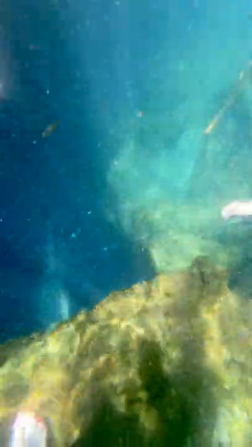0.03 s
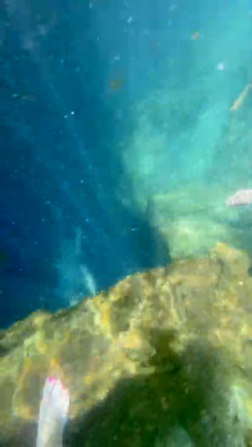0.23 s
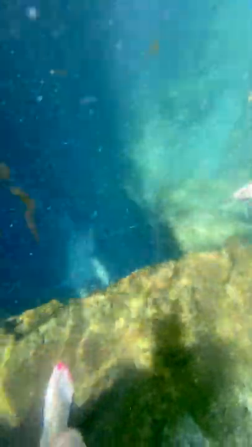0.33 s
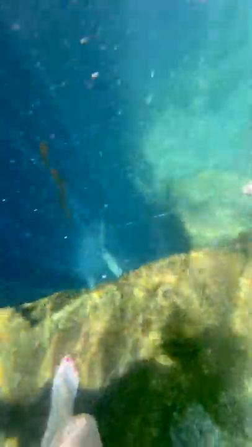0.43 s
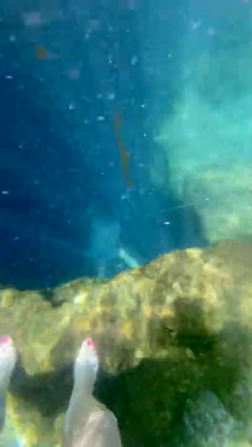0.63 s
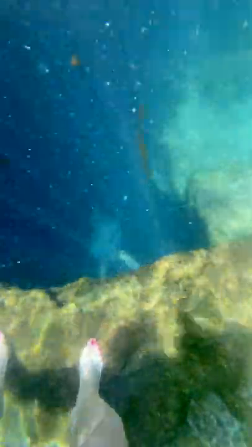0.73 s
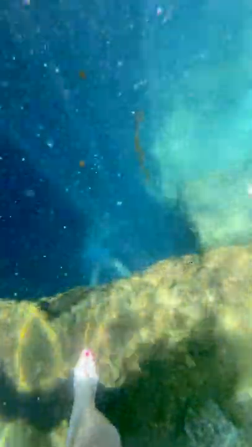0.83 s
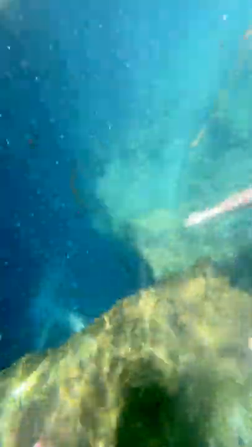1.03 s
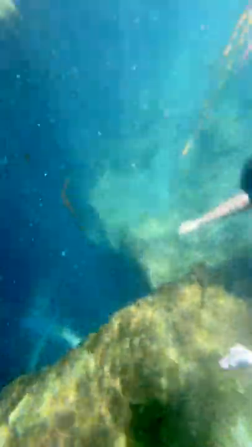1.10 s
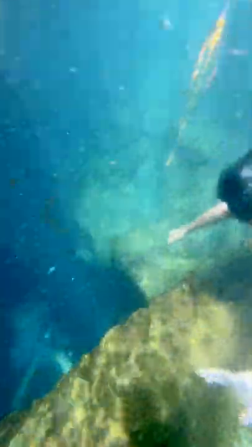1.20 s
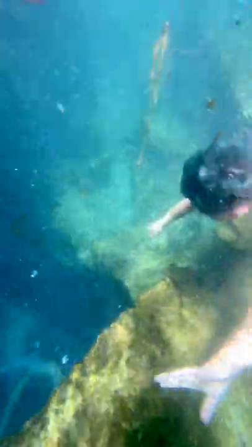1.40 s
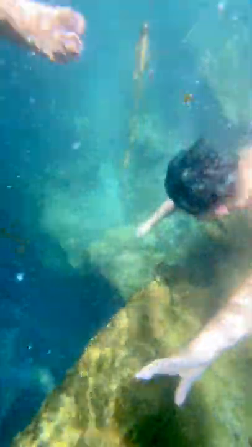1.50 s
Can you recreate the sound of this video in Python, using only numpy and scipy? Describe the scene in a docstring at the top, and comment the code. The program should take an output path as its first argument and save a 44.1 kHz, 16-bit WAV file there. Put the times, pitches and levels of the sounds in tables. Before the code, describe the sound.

Underwater in a pool, bubbles gurgle and gulp close to the microphone, loudest early on, with little blips mostly to the left. The bubbling eases over a soft rumble before water swishes past and knocks dully on the housing.

```python
"""Underwater in a spring pool.

Water moves round a submerged camera, heard at its two ports. Bubbles ring as damped oscillators, the
smaller the higher: clouds of them gurgle, fizz and crackle, single ones blip mostly on the left, and
air pockets gulp near 370 Hz. Eddies rumble and thump on the housing, tiny clicks tick on it, and
turbulence swishes past, mainly late on. Everything is muffled, with almost no treble."""
import sys
import numpy as np
from scipy import signal
from scipy.fft import rfft, irfft, next_fast_len
from scipy.io import wavfile
from scipy.ndimage import uniform_filter1d

SR = 44100
rng = np.random.default_rng(int(sys.argv[2]) if len(sys.argv) > 2 else 0)


def dump_mix(stems):
    """Bounce the given channels to the path in sys.argv[1] as a 16-bit WAV at rate SR."""
    frames = np.atleast_2d(stems).T  # one column per channel
    limited = np.clip(frames, -1, 1)  # hard clip at full scale
    pcm = np.round(limited * 32767).astype(np.int16)
    wavfile.write(sys.argv[1], SR, pcm)


N = 68355
TIME = np.arange(N) / SR


def undb(db):
    """Amplitude ratio of a level in decibels."""
    return 10 ** (np.asarray(db) / 20)


def unit(x):
    """Normalisation to an rms of 1."""
    return x / np.sqrt(np.mean(x ** 2))


def envelope(rows):
    """Gain over time, by interpolation between (time [s], level [dB]) points."""
    return undb(np.interp(TIME, *np.array(rows).T))


def pan(db):
    """Amplitude panning: two gains that put the left channel db above the right."""
    return undb(np.array([[db], [-db]]) / 2)


def colour(x, points):
    """Minimum-phase filtering through (frequency [Hz], gain [dB]) points."""
    hz, db = np.array(points).T
    size = 2 * next_fast_len(N)
    bin_hz = np.maximum(np.arange(size // 2 + 1) * SR / size, 1)
    gain = undb(np.interp(np.log(bin_hz), np.log(hz), db))
    cepstrum = irfft(np.log(gain))
    cepstrum[1:size // 2] *= 2  # folding the cepstrum makes the filter causal
    cepstrum[size // 2 + 1:] = 0
    return irfft(rfft(x, size) * np.exp(rfft(cepstrum)))[:N]


def drift(per_s):
    """Smooth random modulation of rms 1, with per_s new values a second."""
    hold = max(int(SR / per_s), 2)
    steps = np.repeat(rng.standard_normal(N // hold + 1), hold)
    return unit(uniform_filter1d(steps, hold)[:N])


def decay(start, t60):
    """Exponential decay: silence until start, then a fall of 60 dB every t60 seconds."""
    return (TIME > start) * np.exp(-np.log(1000) * np.abs(TIME - start) / t60)


def ring(start, hz, rise, t60):
    """A damped oscillator that swells, then decays; its phase is the integral of its frequency."""
    age = np.maximum(TIME - start, 0)
    cycles = np.cumsum(hz * np.diff(age, prepend=0))
    swell = np.sin(np.pi / 2 * np.minimum(age / rise, 1)) ** 2
    damping = np.exp(-np.log(1000) * np.maximum(age - rise, 0) / t60)
    return swell * damping * np.sin(2 * np.pi * cycles)


def cloud(spectrum, low_hz, high_hz, cycles, spread_db, count):
    """Superposition of random damped bubbles, evenly strewn in time, filtered and set to rms 1."""
    out = np.zeros(2 * N)
    for slot, (when, pitch, strength, polarity) in enumerate(rng.random((count, 4))):
        hz = low_hz * (high_hz / low_hz) ** pitch
        life = np.linspace(0, 1, int(np.clip(cycles * SR / hz, 8, N)))
        phase = 2 * np.pi * cycles * life * (1 + 0.044 * life)  # each pitch rises a little
        bubble = np.exp(-np.log(1000) * life) * np.sin(phase)
        gain = hz * np.sign(polarity - .5) * undb(spread_db * strength ** 2)
        at = int((slot + when) / count * N)
        out[at:at + len(life)] += gain * bubble
    return unit(colour(out[:N], spectrum))


# Envelope of the low bubbling (time [s], level [dB])
GURGLE_LEVELS = [(0, -34.5), (.13, -38), (.23, -30.5), (.39, -21.5), (.44, -26.5), (.57, -31), (.8, -32),
                 (.9, -35.5), (1.09, -35), (1.18, -28.5), (1.32, -36.5), (1.55, -44)]
# Filter on the low bubbling (frequency [Hz], gain [dB])
GURGLE_FILTER = [(90, -24), (150, -12.5), (220, -6), (275, -1.5), (315, -9), (390, -2.5), (450, 0),
                 (530, -2.5), (620, -15), (900, -29), (1500, -39.5)]
def gurgle():
    """Large bubbles resonate low; a cloud common to both ports makes them partly coherent."""
    shared, left, right = (
        cloud(GURGLE_FILTER, low_hz=129.5, high_hz=898, cycles=6.9, spread_db=12.5, count=500)
        for _ in range(3))
    return unit(shared + undb(-3) * np.array([left, right])) * envelope(GURGLE_LEVELS)


# Response of the right port to small bubbles on the left (frequency [Hz], gain [dB])
FAR_PORT_RESPONSE = [(700, -21), (1250, -22), (1800, -9.5), (2400, -15.5), (4000, -8)]
def far_port(near):
    """A transfer function gives the weaker sound that reaches the right port."""
    return colour(near, FAR_PORT_RESPONSE)


def hollow_ring(start_hz=1049, first_second_climb_hz=274.5, width_hz=110):
    """A narrow, restless resonance whose frequency climbs as the trapped air shrinks."""
    hz = start_hz + first_second_climb_hz * np.sqrt(TIME)
    phase = 2 * np.pi * np.cumsum(hz) / SR
    in_phase, quadrature = uniform_filter1d([drift(width_hz), drift(width_hz)], size=100)
    return unit(in_phase * np.cos(phase) + quadrature * np.sin(phase))


# Envelope of the cloud of small bubbles (time [s], level [dB])
FIZZ_LEVELS = [(0, -35), (.15, -37), (.21, -27.5), (.31, -29.5), (.37, -34.5), (.6, -31.5), (.86, -32.5),
               (.92, -35), (.99, -30.5), (1.08, -36), (1.26, -30.5), (1.41, -41), (1.55, -40)]
# Filter on that cloud, dulled by the housing (frequency [Hz], gain [dB])
FIZZ_FILTER = [(300, -22.5), (620, -14.5), (850, -9.5), (1060, 0.5), (1380, -4.5), (1600, -17), (2050, -26),
               (2650, -28), (3100, -47), (4300, -38.5), (5300, -60), (9000, -80.5)]
def fizz():
    """Small bubble resonances add incoherently to a fluttering fizz on the left, with a hollow ring."""
    near, stray = (
        cloud(FIZZ_FILTER, low_hz=542.4, high_hz=3487, cycles=28.5, spread_db=6.5, count=1700)
        for _ in range(2))
    left = unit(near + undb(-5.5) * hollow_ring())
    right = far_port(left) + undb(-18.5) * stray
    flutter = undb(drift(per_s=40))  # 1 dB rms
    return np.array([left, right]) * envelope(FIZZ_LEVELS) * flutter


# Envelope of the faint crackle (time [s], level [dB])
CRACKLE_LEVELS = [(0, -66), (.1, -58.5), (.15, -67.5), (.37, -66), (.6, -69.5), (.85, -72.5), (1.0, -63),
                  (1.08, -79), (1.42, -79), (1.55, -70.5)]
# Filter on the crackle (frequency [Hz], gain [dB])
CRACKLE_FILTER = [(1800, -2.5), (2600, 4), (3200, -2), (4300, -1.5), (5200, -20), (7000, -22), (9000, -40)]
def crackle():
    """The smallest bubbles resonate highest; amplitude modulation groups them in loose clusters."""
    ports = np.array([
        cloud(CRACKLE_FILTER, low_hz=2015, high_hz=6400, cycles=49, spread_db=14, count=1400)
        for _ in range(2)])
    clusters = undb(1.5 * drift(per_s=40))
    return ports * envelope(CRACKLE_LEVELS) * clusters * pan(db=8.5)


# Spectrum of the eddies' pressure (frequency [Hz], relative density [dB])
RUMBLE_SPECTRUM = [(15, -28.5), (30, -14.5), (52, 0), (80, -2.5), (120, -6.5), (200, -18), (400, -27),
                   (900, -74.5)]
def rumble():
    """Eddies make slow pressure fluctuations, largely in antiphase at the two ports."""
    mid, side = (
        unit(colour(rng.standard_normal(N), RUMBLE_SPECTRUM) * undb(1.1 * drift(per_s=9.9)))
        for _ in range(2))
    return undb(-41.5) * mid + undb(-35.5) * side * np.array([[1], [-1]])


def pinch_off(start, hz):
    """A bubble detaches with a transient: a noise burst in a band round its pitch, muffled above."""
    burst = decay(start, t60=0.009) * rng.standard_normal(N)
    band = signal.butter(5, [hz / 2, 1.15 * hz], "band", fs=SR, output="sos")
    return signal.sosfilt(band, burst) * np.sqrt(SR / hz / 2)  # equal power for any bandwidth


# Single small bubbles (start [s], frequency [Hz], relative level [dB], 60 dB decay time [s])
SMALL_BUBBLES = [(0.008, 1050, -20.5, 0.047), (0.046, 1043, -24, .06), (0.077, 1823, -35, 0.051),
                 (0.105, 2005, -37, 0.051), (0.197, 2520, -35.5, 0.021), (0.207, 1088, -21, 0.035),
                 (0.227, 1244, -20, 0.036), (0.246, 2260, -37.5, 0.031), (0.249, 1148, -15.5, 0.03),
                 (0.259, 1352, -19.5, 0.061), (0.28, 1063, -14.5, 0.088), (0.292, 1804, -26.5, 0.039),
                 (0.299, 1270, -16.5, 0.072), (0.3143, 1200, -7, 0.07), (0.775, 4180, -60, .025),
                 (0.402, 1210, -21.5, 0.016), (0.443, 1284, -25, .06), (0.473, 1014, -21.5, 0.09),
                 (0.472, 1675, -35.5, 0.045), (0.473, 3270, -49.5, 0.018), (0.914, 3700, -53, 0.02),
                 (1.032, 2820, -46, 0.024), (0.787, 1327, -23.5, 0.047), (0.875, 1400, -19, 0.03),
                 (0.875, 2680, -35.5, 0.02), (1.229, 1345, -22.5, 0.081), (1.246, 1383, -26, 0.06),
                 (1.279, 1385, -23, 0.043), (1.354, 1376, -21.5, 0.074), (1.469, 2366, -36.5, 0.023),
                 (1.502, 2630, -38, .028), (1.539, 2660, -44.5, 0.027)]
def blips(glide_per_s=0.22):
    """Pinch-off sets bubbles by the left port into free oscillation, wobbling and rising in pitch."""
    wobble = 0.012 * drift(per_s=400)
    near = np.zeros(N)
    for start, hz, db, t60 in SMALL_BUBBLES:
        gliding_hz = hz * (1 + wobble + glide_per_s * (TIME - start))
        tone = ring(start, gliding_hz, rise=0.0027, t60=t60)
        click = undb(-7.5) * (hz / 2500) ** 2 * pinch_off(start, hz)  # smaller bubbles click more
        near += undb(db) * (tone + click)
    return undb(3) * np.array([near, far_port(near)])


# Tiny clicks on the housing (start [s], level [dB])
HOUSING_TICKS = [(0.079, -50), (0.106, -49), (0.247, -51), (0.506, -59), (1.284, -36.5), (1.471, -52.5)]
# Filter on the clicks (frequency [Hz], gain [dB])
TICK_FILTER = [(1000, -8), (3300, 4.5), (5000, -5.5), (8000, -9), (10000, -47.5)]
def ticks():
    """Brief transients have broad spectra: milliseconds of noise make sharp clicks on the housing."""
    bursts = sum(undb(db) * decay(start, t60=0.0059) for start, db in HOUSING_TICKS)
    return colour(bursts * rng.standard_normal(N), TICK_FILTER) * pan(db=14)


# Large air pockets (start [s], frequency [Hz], level [dB], rise [s], upper mode re lower mode [dB])
AIR_POCKETS = [(0.203, 439.4, -22, 0.0024, -22.5), (0.25, 359, -19, 0.0047, -8),
               (0.274, 466, -16, 0.0056, -10.5), (0.299, 360.3, -15, 0.04, -10.5),
               (0.340, 366.6, -9.5, 0.02, -2.5), (0.388, 360.3, -10, 0.0084, -5.5),
               (0.436, 389, -13.5, .034, -14), (0.496, 368, -10.5, 0.0038, -11),
               (0.572, 389, -21, .014, -13), (0.619, 376.4, -18, 0.023, -13), (0.692, 389, -18, 0.024, -10),
               (0.755, 384.3, -19, 0.017, -8), (0.78, 389.5, -16, 0.012, -19.5),
               (0.86, 264.6, -32.5, 0.093, -10), (0.948, 411.3, -26, 0.0046, -10.5),
               (1.021, 276.3, -25.5, 0.021, -21.5), (1.135, 449.6, -24.5, 0.049, -17),
               (1.155, 274, -23.5, 0.039, -15.5), (1.388, 575, -30, 0.01, -28),
               (1.538, 434, -31.5, 0.0089, -22)]
def gulps(upper_mode_hz=521.6, left_lag_s=0.00027):
    """Air pockets pulsate at their natural frequency and stir a second mode that beats against it."""
    throbs = np.zeros((2, N))
    for start, hz, db, rise, upper_db in AIR_POCKETS:
        own_hz, upper_hz = (f * (1 + 0.012 * drift(per_s=90)) for f in (hz, upper_mode_hz))
        arrivals = (start + left_lag_s, start)
        own = np.array([ring(at, own_hz, rise, t60=0.12) for at in arrivals])
        upper = np.array([ring(at, upper_hz, rise, t60=0.13) for at in arrivals])
        throbs += undb(db) * (own * pan(db=3) + undb(upper_db) * upper * pan(db=-5.5))
    return throbs + undb(-64) * spray(throbs)


def spray(throbs):
    """Strong throbs shed a fine spray: noise, amplitude-modulated by them and high-passed."""
    high_pass = signal.butter(2, 5000, "high", fs=SR, output="sos")
    return signal.sosfilt(high_pass, throbs * rng.standard_normal((2, N)))


# Eddies striking the housing (start [s], frequency [Hz], level [dB], left minus right [dB])
EDDY_KNOCKS = [(0.378, 58.2, -18.5, -5.5), (0.381, 187, -16.5, 4), (0.438, 159.3, -21, 0),
               (0.531, 61.9, -29, 0), (0.963, 65.8, -27, 10), (1.036, 68.6, -29, 4), (0.503, 172, -29, 7.5),
               (1.24, 219.5, -16, 3), (1.251, 211, -17, 0.5), (1.262, 203, -14.5, -11),
               (1.282, 232, -14, -2.5), (1.294, 277, -18.5, 1), (1.317, 247, -21, -2)]
def thumps(decay_cycles=5.5):
    """Eddies knock on the housing; heavy damping ends each dull vibration in a few cycles."""
    return sum(undb(db) * pan(pan_db) * ring(start, hz, rise=0.0039, t60=decay_cycles / hz)
               for start, hz, db, pan_db in EDDY_KNOCKS)


# Rushes of water over the housing (start [s], rise [s], release time constant [s], level [dB])
WATER_RUSHES = [(0.514, 0.0089, 0.01, -28.5), (1.107, 0.083, 0.023, -25), (1.276, 0.0086, 0.025, -25)]
# Spectrum of the turbulence (frequency [Hz], relative density [dB])
SWISH_SPECTRUM = [(100, 4.5), (250, 6), (450, 4.5), (750, -0.5), (1200, -8), (2000, -22.5), (3200, -36),
                  (6000, -49.5), (9000, -72.5)]
def swishes():
    """Turbulent flow makes broadband noise that builds up over the housing and lets go."""
    flow = np.zeros(N)
    for start, rise, release, db in WATER_RUSHES:
        build = np.clip((TIME - start) / rise, 0, 1) ** 0.63
        fade = np.exp(-np.maximum(TIME - start - rise, 0) / release)
        flow += undb(db) * build * fade
    rough_noises = (rng.standard_normal(N) * undb(4.2 * drift(per_s=200)) for _ in range(2))
    churn = np.array([unit(colour(noise, SWISH_SPECTRUM)) for noise in rough_noises])
    return flow * churn * pan(db=9.5)


def scene():
    """Linear superposition: the pressures of all sources add at the two ports."""
    return gulps() + blips() + thumps() + gurgle() + fizz() + crackle() + swishes() + rumble() + ticks()


def record(dry, low_cut_hz=45, high_cut_hz=12500):
    """Band limiting: the camera cuts the deepest bass and the top of the treble."""
    high_pass = signal.butter(2, low_cut_hz, "high", fs=SR, output="sos")
    low_pass = signal.ellip(8, .2, 70, high_cut_hz, fs=SR, output="sos")
    return signal.sosfilt(low_pass, signal.sosfilt(high_pass, dry))


dry = scene()
out = record(dry)
dump_mix(out)
```